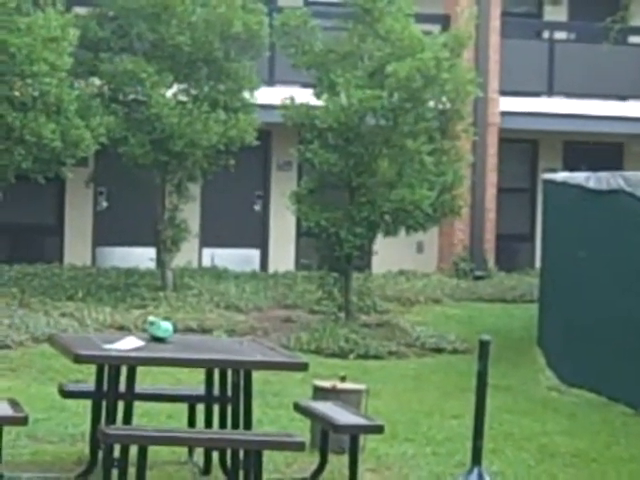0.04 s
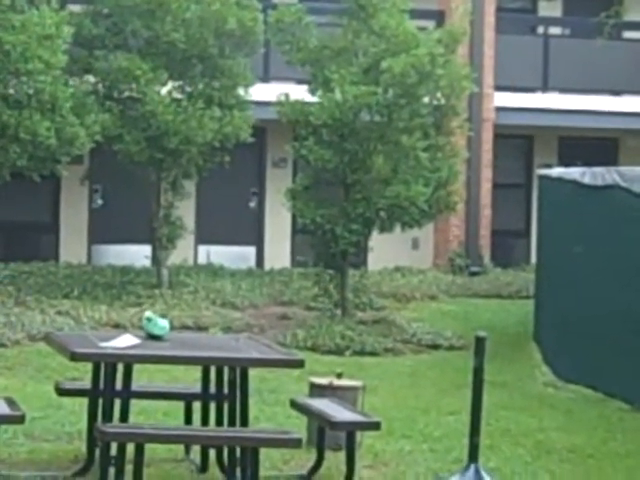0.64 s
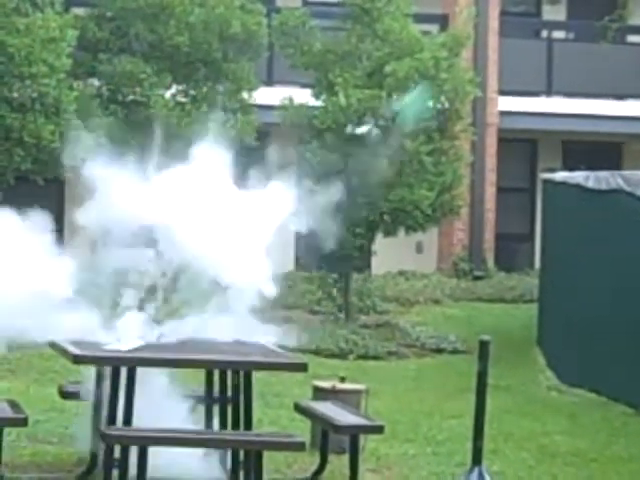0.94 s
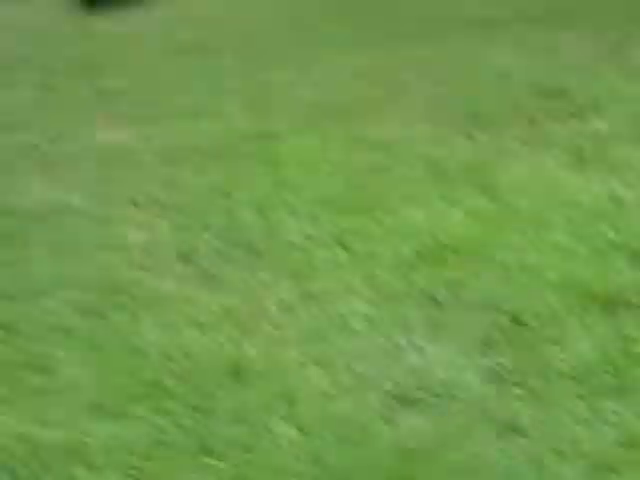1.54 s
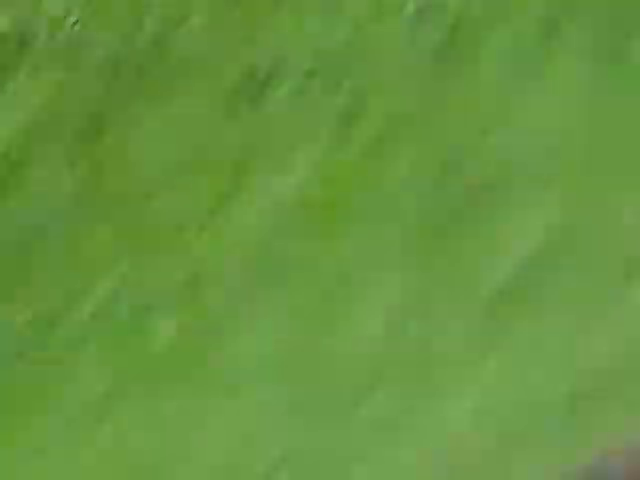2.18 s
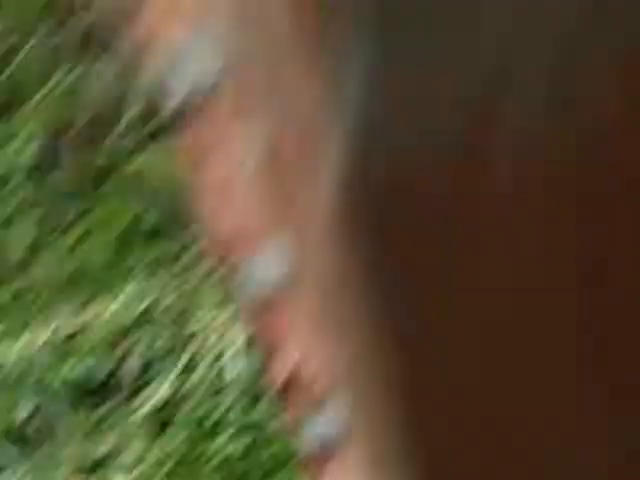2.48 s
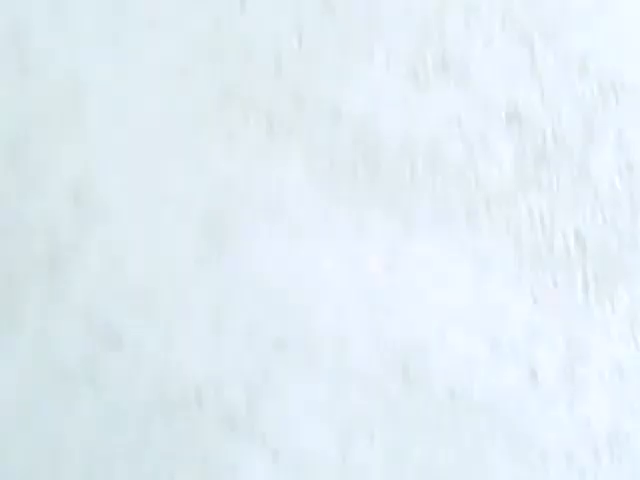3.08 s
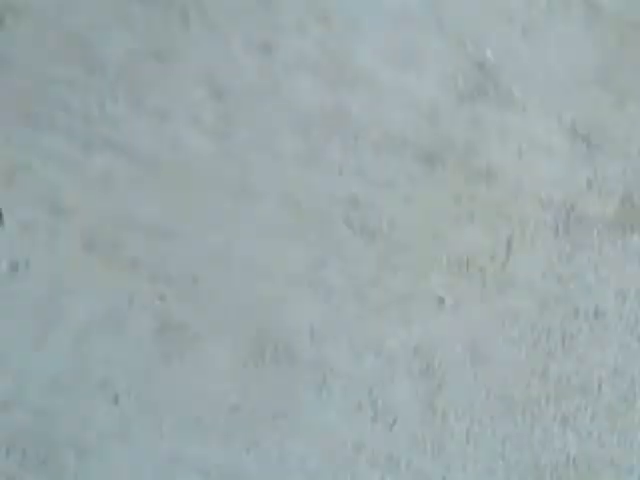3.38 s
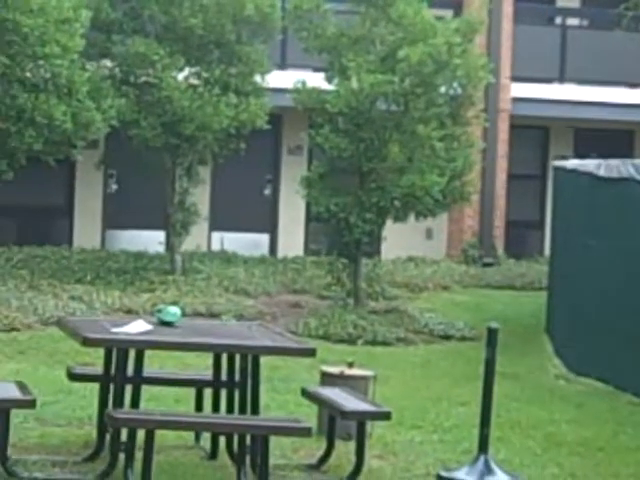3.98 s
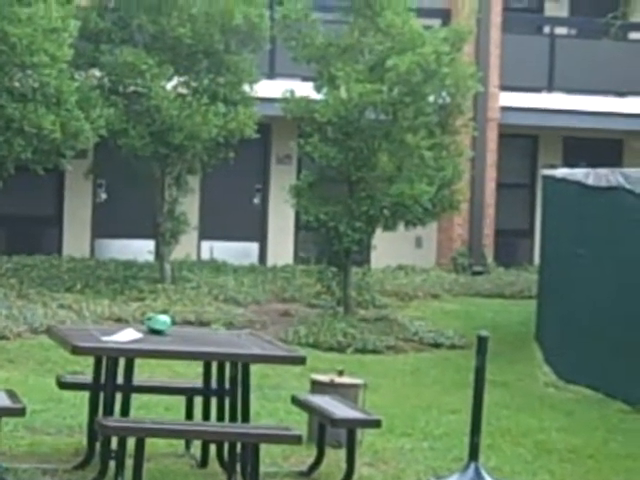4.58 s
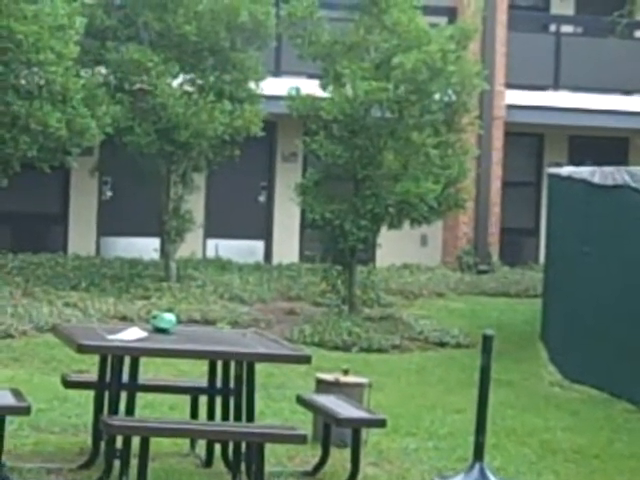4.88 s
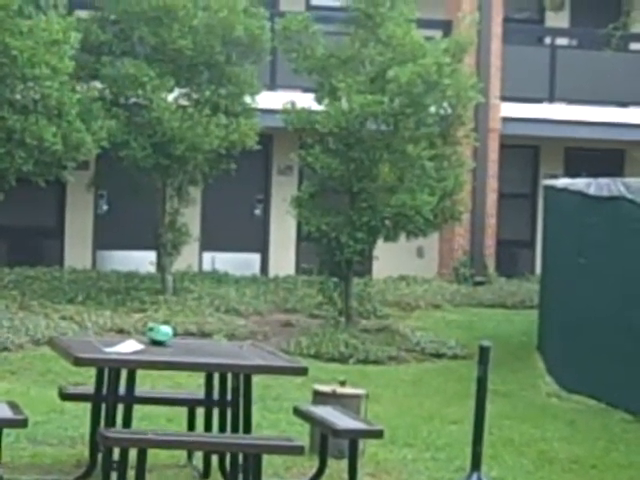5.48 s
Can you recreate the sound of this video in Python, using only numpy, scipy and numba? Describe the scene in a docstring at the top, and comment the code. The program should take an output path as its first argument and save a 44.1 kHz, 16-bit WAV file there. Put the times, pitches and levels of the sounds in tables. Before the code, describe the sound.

A camcorder's microphone picks up its own soft motor whirr, light outdoor hiss and four tiny bird chirps. Suddenly a plastic bottle explodes, a distorted crack with a short roar that rolls between the surrounding house fronts. The level dips and slowly recovers while a hand rubs and knocks on the camcorder, bringing out a faint whining buzz. After a brief dropout, only whirr and hiss remain.

```python
"""A camcorder's drive whirrs over faint courtyard hiss, and a small bird chips four times.
A pressurised bottle bursts on a table: the plastic squeals and tears, a crack swells into a roar,
and the blast rolls round the house fronts. The camcorder overloads and ducks its gain.
It slowly recovers while it is swung about, with scuffs, knocks and a buzz under the gripping hand.
The hiss settles; the sound cuts out for a moment, then the whirr returns without the buzz."""
import sys
import numpy as np
from scipy import signal
from scipy.fft import rfft, irfft
from scipy.io import wavfile
from scipy.ndimage import minimum_filter1d
from numba import njit

SR = 44100
rng = np.random.default_rng(int(sys.argv[2]) if len(sys.argv) > 2 else 0)


def inscribe(sig):
    """Save sig as 16-bit PCM at rate SR to the path in sys.argv[1].

    A 1-D sig is mono; a 2-D sig holds one channel per row.
    Samples are clipped to [-1, 1] before scaling.
    """
    pcm = np.round(np.clip(np.atleast_2d(sig).T, -1, 1) * 32767)
    wavfile.write(sys.argv[1], SR, pcm.astype(np.int16))


N = 253134
T = np.arange(N) / SR
LOG_F = np.log(np.maximum(np.fft.rfftfreq(N, 1 / SR), 1))
BURST_S = 1.0875
GAP_START_S, GAP_END_S = 3.513, 3.598
DRIVE_HZ = 57.76  # turns per second


def undb(db):
    """Decibels to gain."""
    return 10 ** (np.asarray(db) / 20)


def unit(x):
    """Scale to rms 1."""
    return x / np.std(x)


def noise():
    """White noise."""
    return rng.standard_normal(N)


def wander(rate_hz):
    """Random drift with a spread near 1."""
    knots = rng.standard_normal(int(T[-1] * rate_hz) + 2)
    return np.interp(T * rate_hz, np.arange(len(knots)), knots)


def ease(centre_s, width_s):
    """Smooth step from 0 to 1 round a moment."""
    return .5 + .5 * np.tanh((T - centre_s) / width_s)


def bump(centre_s, half_length_s):
    """Bell-shaped swell round a moment."""
    return np.exp(-((T - centre_s) / half_length_s) ** 2)


def fall(start_s, t60_s, hold_s=0):
    """Envelope that jumps up, holds, and dies away."""
    return (T >= start_s) * np.exp(-np.log(1000) * np.clip((T - start_s - hold_s) / t60_s, 0, 10))


def lowpass(x, hz):
    """One-pole low-pass."""
    pole = np.exp(-2 * np.pi * hz / SR)
    return signal.lfilter([1 - pole], [1, -pole], x + 1e-18)


def colour(x, points):
    """Minimum-phase EQ through (freq_hz, level_db) points."""
    hz, db = np.transpose(points)[:2]
    cepstrum = irfft(np.log(undb(np.interp(LOG_F, np.log(hz), db))), N)
    cepstrum[1:N // 2] *= 2
    cepstrum[N // 2 + 1:] = 0
    return irfft(rfft(x) * np.exp(rfft(cepstrum)), N)


@njit
def resonance(x, hz, q):
    """State-variable band-pass with a moving centre."""
    y = np.empty(len(x))
    band_state, low_state = 0., 0.
    for i in range(len(x)):
        g = np.tan(np.pi * hz[i] / SR)
        band = (band_state + g * (x[i] - low_state)) / (1 + g * (g + 1 / q))
        band_state = 2 * band - band_state
        low_state += 2 * g * band
        y[i] = band / q
    return y


def air(level_db=-50, lull_db=-3.5, lull_s=2.95):
    """Faint hiss of leaves and the distant town, which settles into a lull."""
    # tone of the outdoor bed: freq_hz, level_db
    hiss_eq = [(18, -40.5), (30, -10), (55, -8.5), (237, -2.5), (307, -6), (691, -4.5), (1510, -4),
               (2180, -9.5), (4910, -15), (6050, -21), (15500, -31.5)]
    db = level_db + lull_db * ease(lull_s, .13) + .5 * wander(4)
    return undb(db) * unit(colour(noise(), hiss_eq))


def drive_rasp(repeat, run_in=20):
    """Rasp that comes round again on each turn of the drive, slowly changing."""
    turn_samples = int(SR / DRIVE_HZ)
    turns = rng.standard_normal((run_in + N // turn_samples + 2, turn_samples))
    rasp = signal.lfilter([1], [1, -repeat], turns, axis=0)
    return rasp[run_in:].ravel()[:N]


def drive_tones(partials, waver_db=3):
    """The drive's steady pitches waver in strength and drift a little in phase."""
    out = np.zeros(N)
    for hz, db in partials:
        phase = hz * T + rng.random() + .11 * wander(12)
        out += np.sqrt(2) * undb(db + waver_db * wander(4.5)) * np.sin(2 * np.pi * phase)
    return out


def drive_whirr(level_db=-49.5, damp_s=2.97, damp_hz=680, damp_share=.45):
    """The drive rasps and hums; for a while the hand on the body damps its low end."""
    # tone of the rasp: freq_hz, level_db
    rasp_eq = [(60, -13.5), (120, 0.5), (235, -4), (330, -0.5), (850, -1.5), (1100, -4), (1400, -1),
               (1650, 1.5), (2200, -7.5), (3700, -12.5), (4900, -10), (6200, -23), (11700, -22),
               (15000, -24.5)]
    # drive hum, most of it on multiples of the turn rate: pitch_hz, level_db
    partials = [(173.3, -17), (236.9, -14), (750.9, -17), (808.6, -17), (924.2, -16), (1213, -17),
                (1501.8, -13), (1617.3, -14), (1675, -10), (1906.1, -12), (3119, -23), (4909.6, -24),
                (14729, -36)]
    rasp = unit(colour(drive_rasp(repeat=.8), rasp_eq))
    whirr = rasp + undb(-.5 + 1.5 * wander(9)) * drive_tones(partials)
    damping = damp_share * ease(damp_s, .05) * (T < GAP_START_S)
    return undb(level_db + wander(10)) * (whirr - damping * lowpass(whirr, damp_hz))


def bird(length_s=.026, top_hz=7500, end_hz=3200, warble_hz=114.7):
    """Quick raspy chips warble round a high note and hook down, smeared by leaves and walls."""
    # the bird's calls: start_s, peak_db
    chips = [(0.184, -36.5), (.255, -42.5), (0.613, -38), (.903, -43.5)]
    age = T[T < length_s]
    hook_hz = top_hz + (end_hz - top_hz) * (age / length_s) ** 2.1
    warble = 1 - .1 * np.cos(2 * np.pi * warble_hz * age)
    out = np.zeros(N)
    for start_s, db in chips:
        hz = hook_hz * warble * (1 + .06 * wander(900)[:len(age)])
        chip = np.sin(2 * np.pi * np.cumsum(hz) / SR) * signal.windows.tukey(len(age), .15)
        smear = noise() * fall(start_s, t60_s=.2, hold_s=.032) * ease(start_s + .01, .01)
        call = signal.fftconvolve(smear, chip)[:N]
        out += undb(db) * call / np.abs(call).max()
    return out


def tear(length_s=.0032, start_hz=3400, end_hz=2300, peak_db=-12):
    """The splitting plastic squeals downwards just ahead of the blast."""
    progress = np.clip((T - BURST_S) / length_s + 1, 0, 1)
    phase = np.cumsum(start_hz + (end_hz - start_hz) * progress) / SR
    return undb(peak_db) * progress * (T < BURST_S) * np.sin(2 * np.pi * phase)


def shock(length_s=.00056, peak_db=6):
    """N-shaped pressure wave of the released gas."""
    progress = (T - BURST_S) / length_s
    return undb(peak_db) * (1 - 2 * progress) * ((progress >= 0) & (progress < 1))


def reflections(bands, hold_s, spread_db):
    """Countless reflections of uneven strength; each band dies at its own rate."""
    grains = noise() * undb(spread_db * noise())
    spectrum = rfft(unit(colour(grains, bands)))
    hz, _, t60s = np.transpose(bands)
    masks = (np.interp(LOG_F, np.log(hz), row) for row in np.eye(len(hz)))
    return sum(irfft(spectrum * mask, N) * fall(BURST_S, t60, hold_s) for mask, t60 in zip(masks, t60s))


def roar(level_db=11.5, start_hz=1080, end_hz=428, q=.97, attack_s=.038, hold_s=.038):
    """A roar swells and sinks in pitch just after the crack, then collapses to a weaker tail."""
    hz = start_hz + (end_hz - start_hz) * ease(BURST_S + .044, .012)
    band = resonance(resonance(noise(), hz, q), hz, q)
    rise = np.clip((T - BURST_S) / attack_s, 0, 1)
    swell = undb(-16 * (1 - rise ** 2))
    collapse = fall(BURST_S, t60_s=.2, hold_s=attack_s + hold_s)
    tail = undb(-10.5) * fall(BURST_S, t60_s=.6, hold_s=attack_s + hold_s)
    return undb(level_db) * unit(band / np.sqrt(hz)) * swell * np.maximum(collapse, tail)


def bottle_blast():
    """The shock and its close reflections make the crack; the roar gives it body."""
    # scatter off table, ground and near walls: freq_hz, level_db, t60_s
    near_bands = [(40, -20.5, 0.77), (100, -4.5, 1.), (250, 2.5, 1), (600, 4, 0.92), (1200, -1.5, 0.62),
                  (2300, -6, 0.54), (5070, -14, 0.37), (10400, -21.5, 0.34), (16000, -26.5, .34)]
    crack = shock() + undb(7.5) * reflections(near_bands, hold_s=.034, spread_db=5.5)
    return crack + roar()


def yard_reverb():
    """A diffuse ring builds up as the bang crosses the yard again and again."""
    # long tail between the buildings: freq_hz, level_db, t60_s
    yard_bands = [(35, -29.5, 1.47), (81.2, -7.5, 2.62), (170, 3, 2.67), (416, -1.5, 2.51),
                  (695, -2.5, 2.49), (1100, -11, 2.64), (1500, -16, 3.4), (2930, -26, 3.01),
                  (5900, -28, 1.3), (15000, -43.5, 1.2)]
    build_up = (1 - fall(BURST_S, 1.11)) ** 2
    return undb(-7) * reflections(yard_bands, hold_s=.071, spread_db=6.5) * build_up


def house_echoes(blast):
    """Far house fronts throw back the head of the blast, duller."""
    # slaps off the fronts: delay_s, level_db, lowpass_hz
    slaps = [(.2, -17.5, 1500), (.242, -13, 1400), (.345, -24.5, 1300), (.373, -13.5, 1000),
             (0.456, -22.5, 950), (.5, -38, 1300), (.745, -32, 1800), (.805, -32.5, 800)]
    head = blast * fall(BURST_S, t60_s=.2, hold_s=.0096)
    out = np.zeros(N)
    for delay_s, db, hz in slaps:
        delayed = np.interp(T - delay_s, T, head)
        out += undb(db) * lowpass(lowpass(delayed, hz), 3 * hz)
    return out


def cloth_scuffs():
    """Cloth and hand brush the camcorder, catching and slipping so the rub is never even."""
    # strokes: centre_s, half_length_s, level_db, centre_hz, q
    strokes = [(1.85, 0.011, -53, 4500, 1), (2.595, 0.027, -43, 4700, 0.91),
               (2.629, 0.0097, -41, 1900, 3.1), (2.9, 0.42, -55.5, 2500, 0.65),
               (2.953, .01, -51, 6000, 0.46), (3.042, 0.0054, -45, 1900, 4), (3.21, 0.04, -57, 4500, .5)]
    fibres = noise() * undb(6 * noise() + 2.6 * wander(67))
    out = np.zeros(N)
    for centre_s, half_length_s, db, hz, q in strokes:
        rub = unit(resonance(fibres, np.full(N, float(hz)), float(q)))
        out += undb(db) * bump(centre_s, half_length_s) * rub
    return out


def grip_buzz(attack_s=.034):
    """A bright, whining buzz, pulsing once a turn of the drive, gets through while the body is gripped."""
    # tone of the buzz: freq_hz, level_db
    buzz_eq = [(500, -16), (2000, -4), (3100, -11.5), (3600, -9), (4330, -1.5), (4750, -6), (5250, -0.5),
               (5900, -9), (9500, -19.5), (11700, -21), (13500, -21), (15000, -19)]
    # whines riding on its rasp: pitch_hz, level_db
    whines = [(4332, -13), (5256.2, -13)]
    # the hand closes, then tightens, each time adding buzz: start_s, level_db
    grips = [(2.58, -58), (3.266, -50.5)]
    buzz = unit(colour(drive_rasp(repeat=.46), buzz_eq)) + drive_tones(whines)
    pulse = 1 + .55 * np.cos(2 * np.pi * DRIVE_HZ * T)
    grip = sum(undb(db) * np.clip((T - start_s) / attack_s, 0, 1) for start_s, db in grips)
    return grip * pulse * buzz * (T < GAP_START_S)


def case_knocks(rattle_db=-19):
    """Each knock on the camcorder's case is a sharp snap with a short rattle."""
    # hits on the body: start_s, peak_db, t60_s
    knocks = [(2.7745, -11, 0.0032), (2.7785, -22.5, 0.023), (2.9555, -30.5, 0.0033), (3.2662, -18, 0.021),
              (3.272, -29, 0.074)]
    # tone of the case: freq_hz, level_db
    case_eq = [(300, -23), (1200, -8.5), (2200, 1.5), (3100, 2), (4300, 0), (5400, -9.5), (6600, -7.5),
               (10000, -24), (16000, -20)]
    out = np.zeros(N)
    for start_s, db, t60_s in knocks:
        snap = signal.unit_impulse(N, int(start_s * SR))
        rattle = undb(rattle_db) * noise() * fall(start_s, t60_s)
        click = colour(snap + rattle, case_eq)
        out += undb(db) * click / np.abs(click).max()
    return out


def hand_thuds(spread_db=3, flutter_hz=65):
    """The hand shifts on the body with soft, uneven thuds."""
    # moves of the hand: centre_s, half_length_s, level_db
    shifts = [(2.82, 0.032, -43.5), (2.973, 0.065, -43)]
    thud_eq = [(30, -20), (110, 6), (300, -4), (700, -15), (3000, -44)]  # freq_hz, level_db
    shifting = sum(undb(db) * bump(centre_s, half_length_s) for centre_s, half_length_s, db in shifts)
    pressure = shifting * undb(spread_db * wander(flutter_hz))
    return pressure * unit(colour(noise(), thud_eq))


def scene():
    """Everything that reaches the microphone, in mono."""
    blast = bottle_blast()
    bang = tear() + blast + yard_reverb() + house_echoes(blast)
    background = bird() + drive_whirr() + air()
    handling = cloth_scuffs() + grip_buzz() + case_knocks() + hand_thuds()
    return (background + bang + handling)[None]


def gain_control(x, threshold_db=-20, depth_db=13, hold_s=.97, release_db_per_s=17, smooth_hz=150):
    """Loud sound pulls the gain down at once; it is held, then creeps back at a steady rate."""
    level_db = 10 * np.log10(lowpass(x ** 2, 22) + 1e-12)
    cut_db = np.clip(level_db - threshold_db, 0, depth_db)
    half_hold = int(hold_s * SR / 2)
    held_db = -minimum_filter1d(-cut_db, 2 * half_hold + 1, origin=half_hold, mode="constant")
    ramp_db = release_db_per_s * T
    released_db = np.maximum.accumulate(held_db + ramp_db) - ramp_db
    return x * undb(-lowpass(released_db, smooth_hz))


def record(dry, low_cut_hz=30, high_cut_hz=15550):
    """The camcorder trims deep bass and top, ducks and clips the blast. Separately, all sound drops out for a
    moment near 3.5 s."""
    low_cut = signal.butter(2, low_cut_hz, "high", fs=SR, output="sos")
    high_cut = signal.ellip(10, .2, 70, high_cut_hz, fs=SR, output="sos")
    ducked = gain_control(signal.sosfilt(low_cut, dry[0]))
    clipped = .97 * ducked / (1 + ducked ** 4) ** (1 / 4)
    audible = (T < GAP_START_S) | (T > GAP_END_S)
    return signal.sosfilt(high_cut, clipped * audible)[None]


dry = scene()
out = record(dry)
inscribe(out)
```